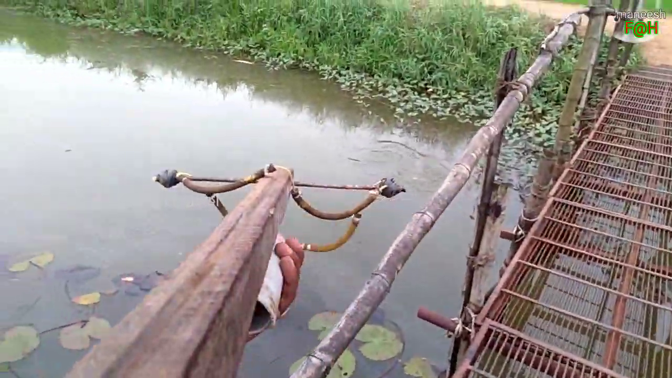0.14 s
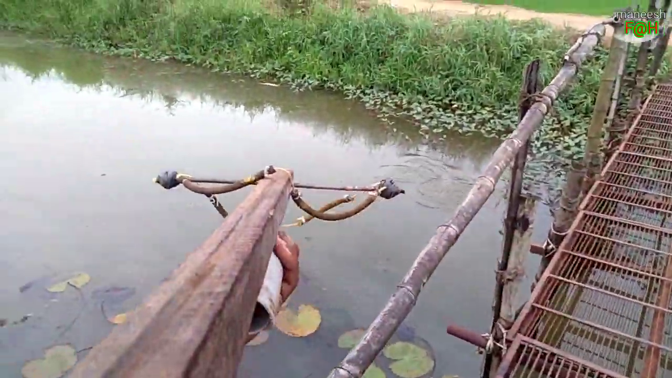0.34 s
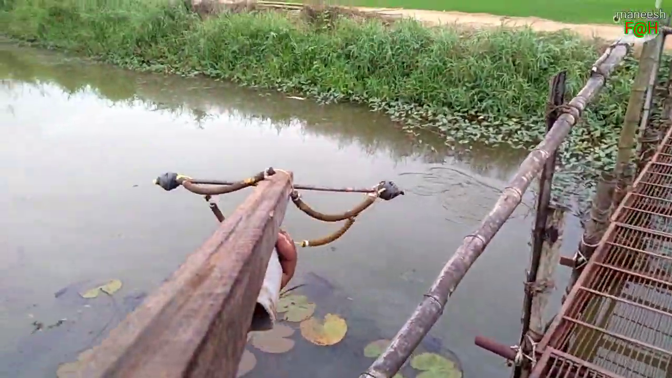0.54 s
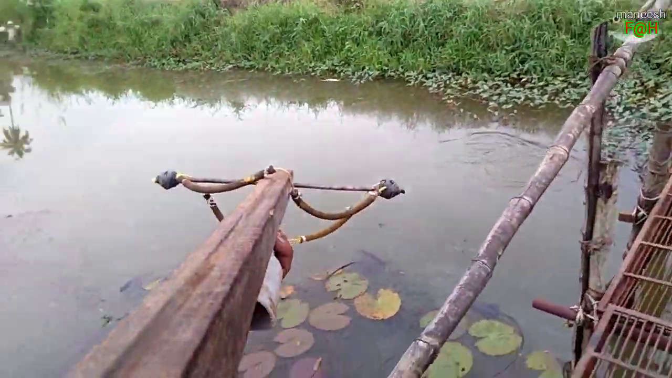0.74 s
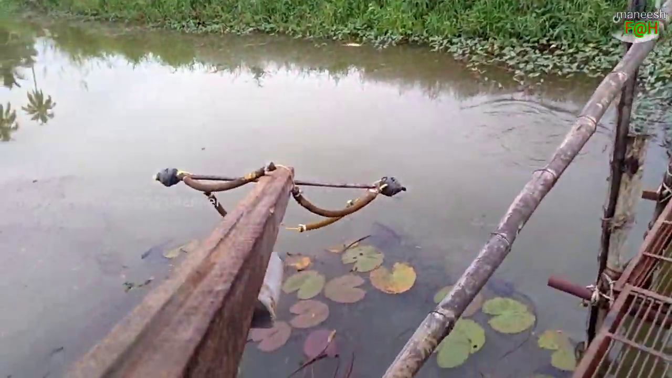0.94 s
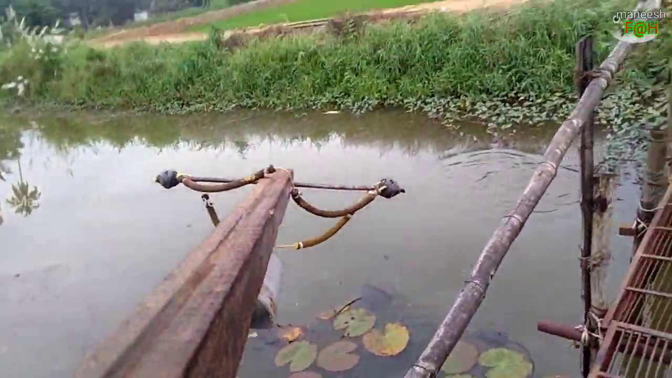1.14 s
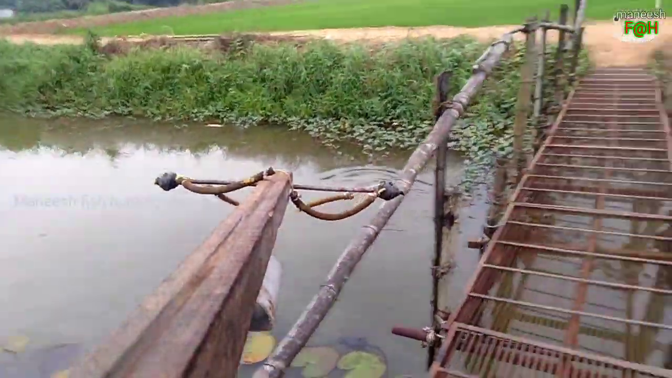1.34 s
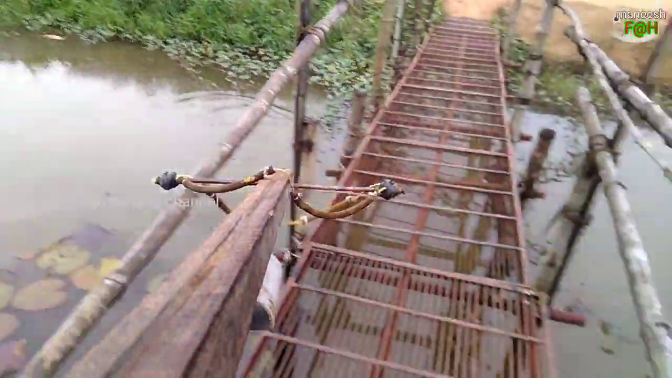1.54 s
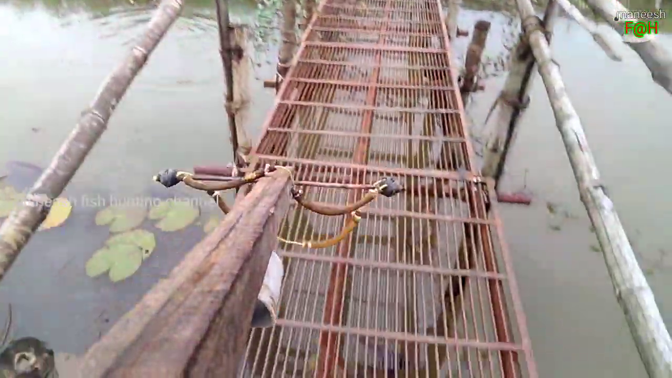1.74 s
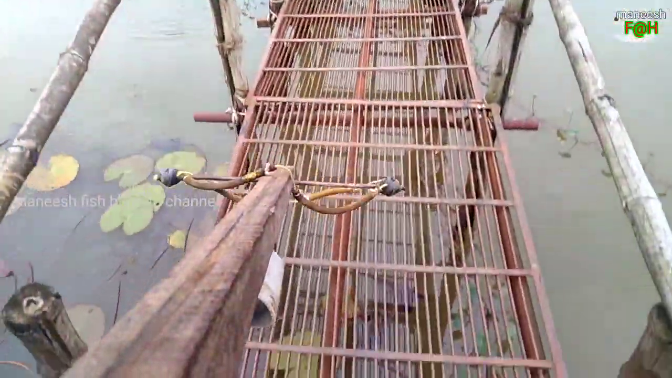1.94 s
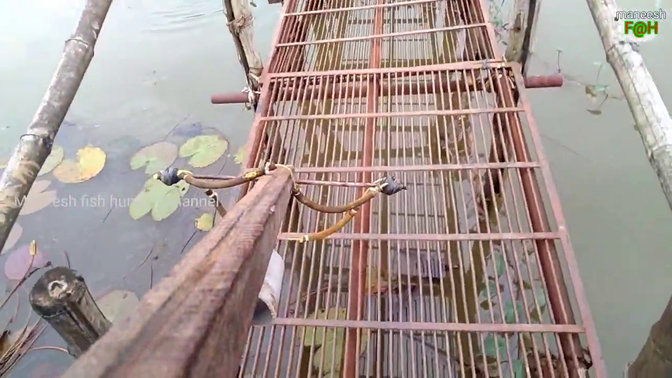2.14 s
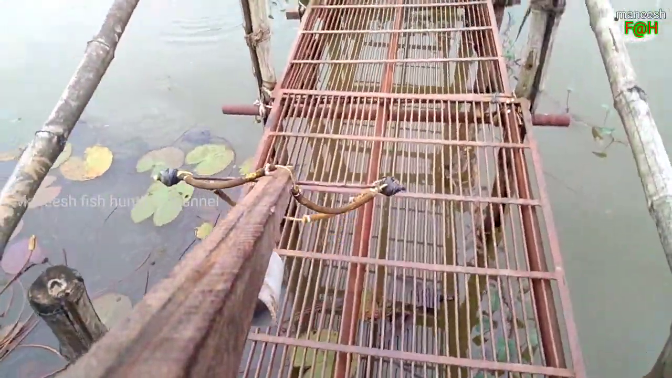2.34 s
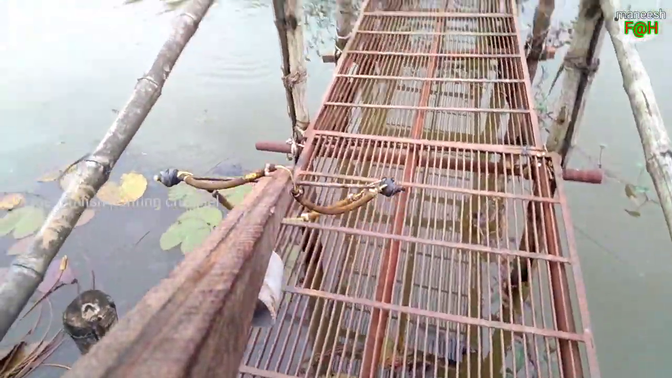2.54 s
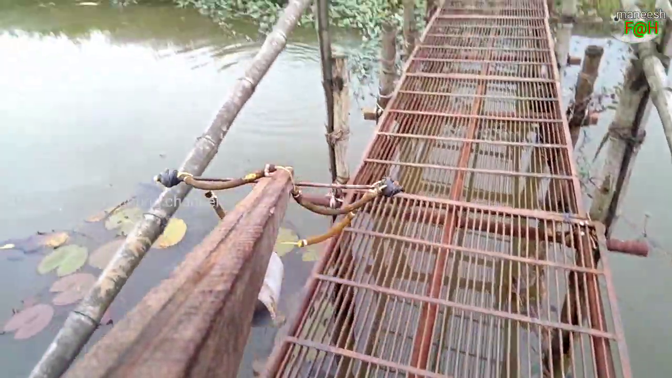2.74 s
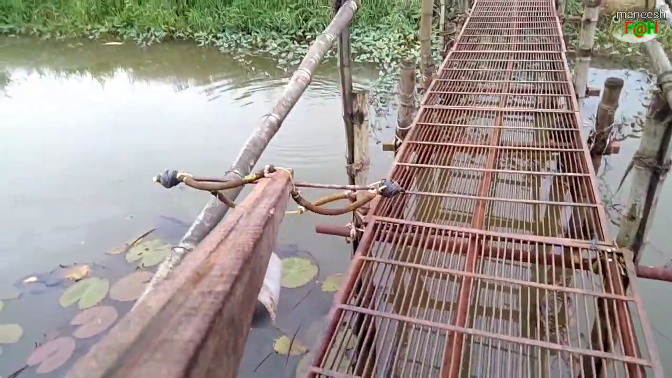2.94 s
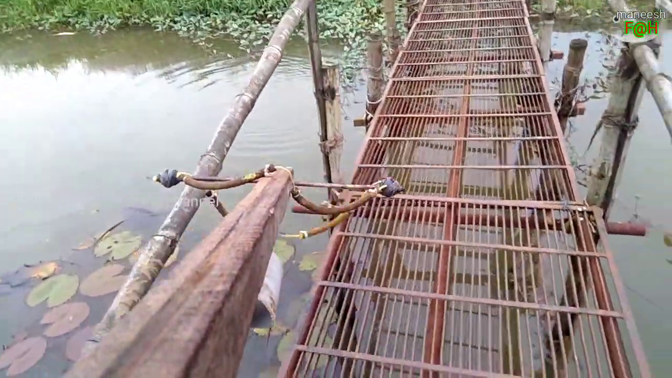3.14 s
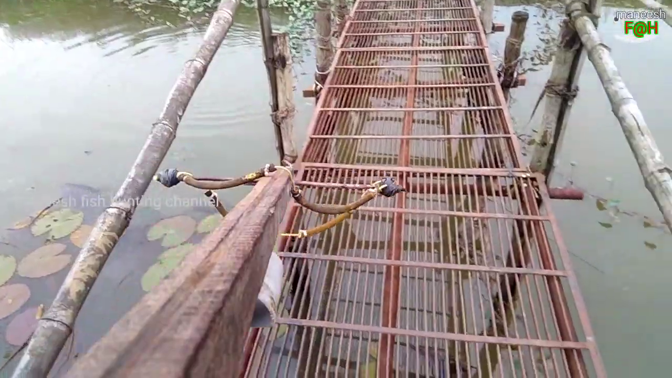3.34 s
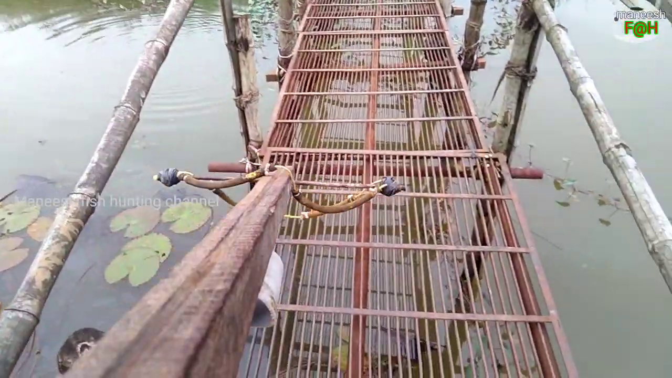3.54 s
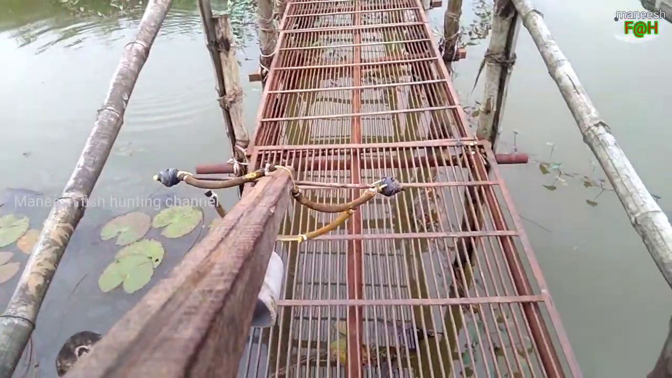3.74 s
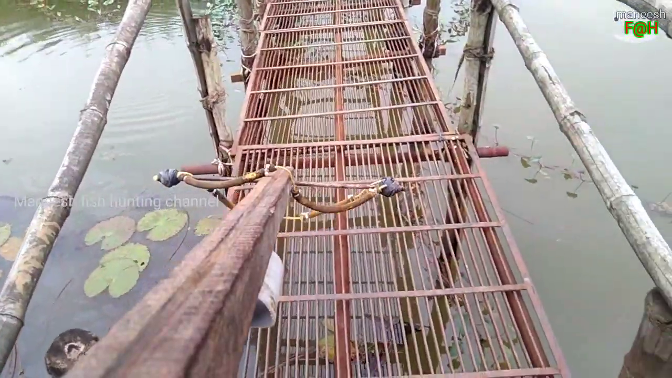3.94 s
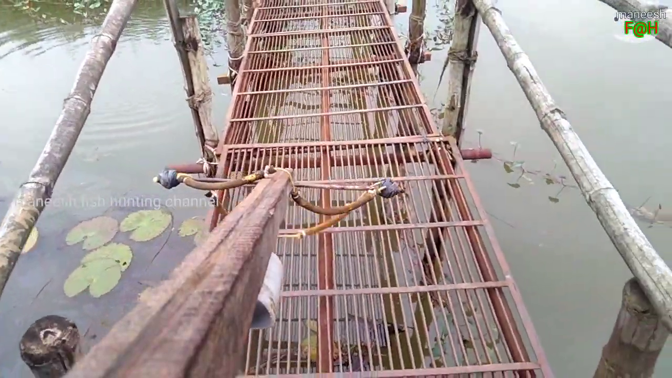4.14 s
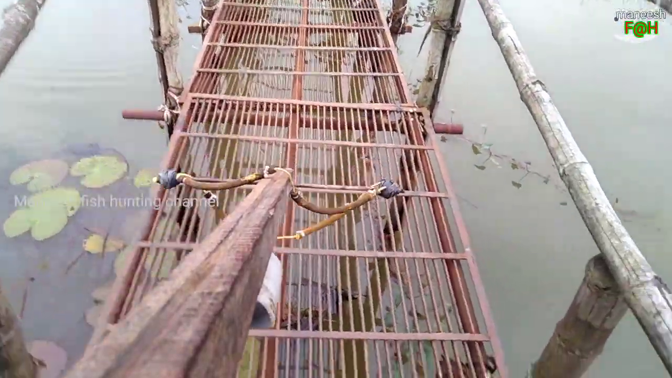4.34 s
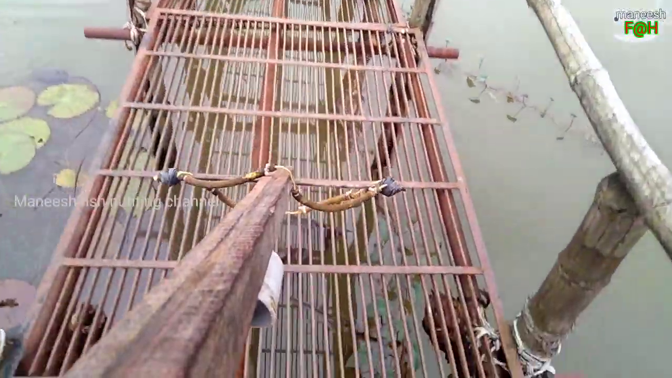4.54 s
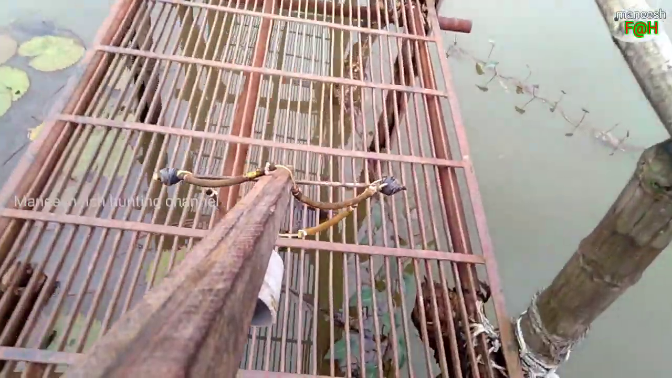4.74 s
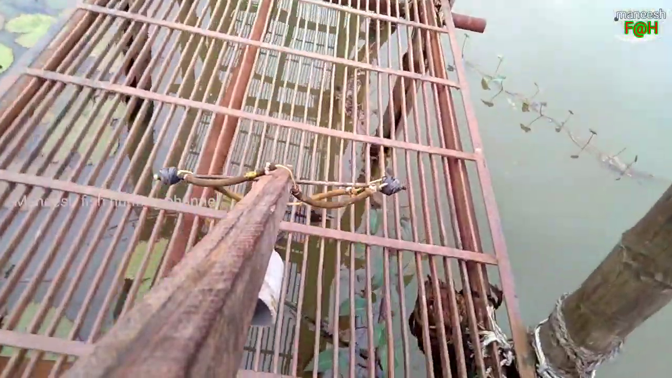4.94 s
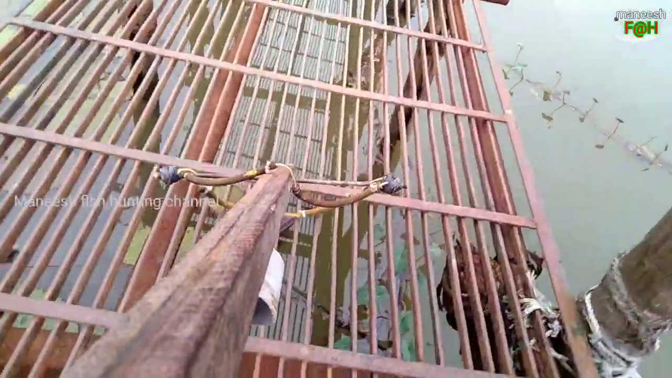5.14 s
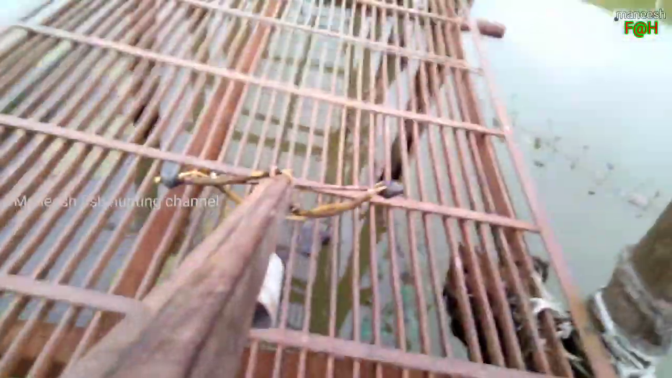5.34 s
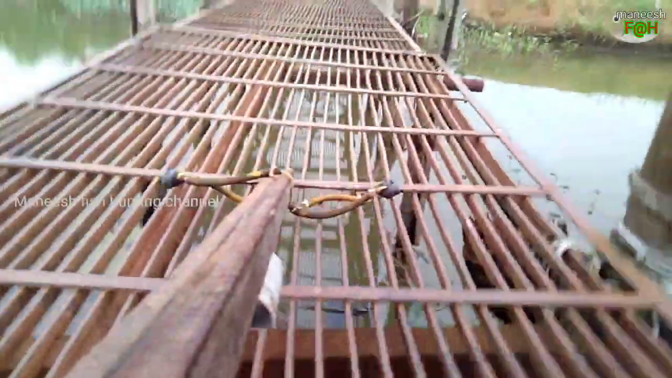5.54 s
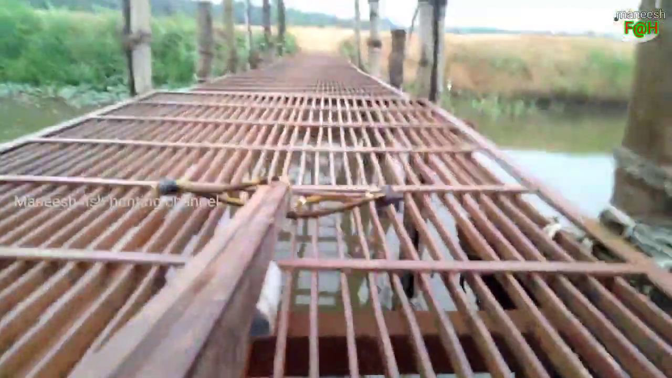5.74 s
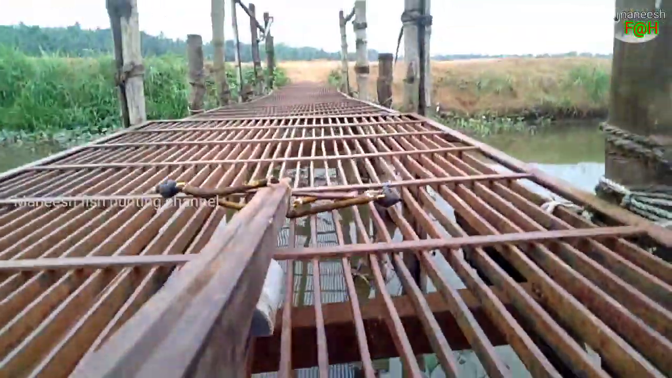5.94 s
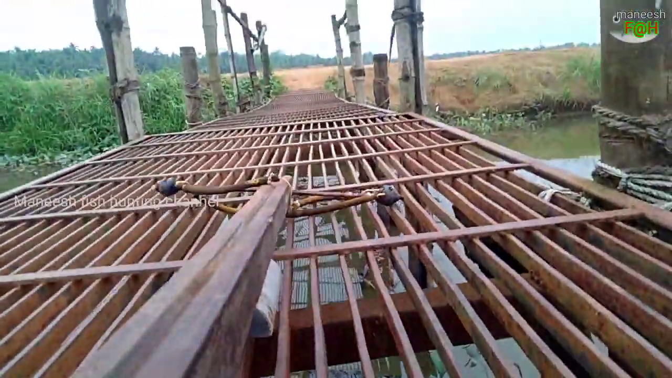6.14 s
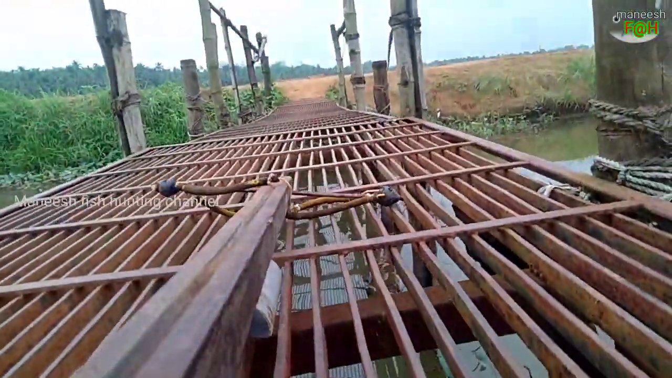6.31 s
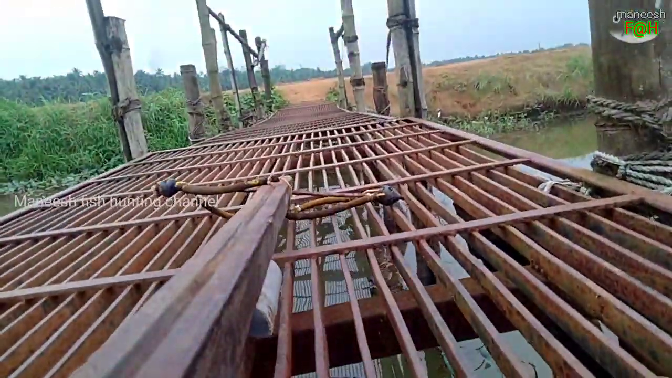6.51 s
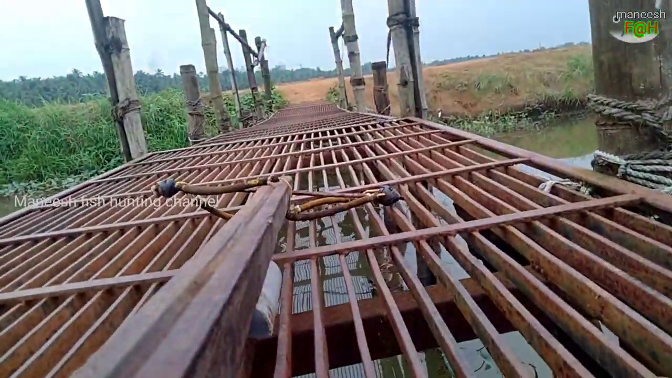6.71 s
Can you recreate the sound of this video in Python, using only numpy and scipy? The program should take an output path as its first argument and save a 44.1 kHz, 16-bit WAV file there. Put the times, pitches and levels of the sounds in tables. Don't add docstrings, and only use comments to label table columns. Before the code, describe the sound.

Close handling of a wooden crossbow clicks and rustles over steady insects and far birds, then the stock thuds twice onto a ringing steel grate.

```python
import sys
import numpy as np
from scipy import signal
from scipy.fft import rfft, irfft
from scipy.io import wavfile
from scipy.ndimage import uniform_filter1d

SR = 44100
rng = np.random.default_rng(int(sys.argv[2]) if len(sys.argv) > 2 else 0)


def output_pcm(signal):
    pcm = np.clip(np.atleast_2d(signal).T, -1, 1) * 32767
    wavfile.write(sys.argv[1], SR, np.round(pcm).astype(np.int16))


def nominal_scale(level):
    x = np.asarray(level, float) / 20
    return 10 ** x


N = 302965
TIME = np.arange(N) / SR
LAID_DOWN_S = 5.7
METAL_HZ, WOOD_HZ = 5600, 4570

# frequency in Hz, level in dB, 60 dB decay in s.
BOARD_MODES = [(263, -4.5, 0.028), (367, -1.5, 0.024), (385, -3.5, 0.05), (555, -6.5, 0.046),
               (754, -2.5, 0.031), (944, -4, 0.029), (1370, -14, 0.052), (1870, -9.5, 0.015),
               (2447, -6, 0.033)]
# frequency in Hz, level in dB, 60 dB decay in s.
BAR_MODES = [(319, -22.5, 1.47), (357.4, -20.5, 1.54), (446, -16, 0.7), (702, -23, 0.94), (614, -24, 0.7),
             (657, -8, 0.37), (752, -24, 1.09), (962, -24, 0.8), (1012.4, -22.5, 1.5), (1110, -27.5, 0.6),
             (1052, -29.5, 1.2), (1475, -21, 0.087), (2050, -11.5, 0.13), (2790, -9.5, 0.374)]


def level(x, db):
    return x * nominal_scale(db) / np.sqrt(np.mean(x ** 2))


def curve(table):
    s, *columns = np.transpose(table)
    return [np.interp(TIME, s, c, left=-140, right=-140) for c in columns]


def band(x, lo_hz, hi_hz, order=2):
    sos = signal.butter(order, [lo_hz, min(hi_hz, .45 * SR)], "band", fs=SR, output="sos")
    return signal.sosfilt(sos, x)


def band_sum(x, bands, order=2):
    return sum(nominal_scale(db) * level(band(x, hz - width / 2, hz + width / 2, order), 0)
               for hz, width, db in bands)


def coloured(table):
    hz, db = np.transpose(table)
    f = np.arange(N // 2 + 1) * SR / N + 1
    shape_db = np.interp(np.log(f), np.log(hz), db, left=-99, right=-99)
    return level(irfft(rfft(rng.standard_normal(N)) * nominal_scale(shape_db), N), 0)


def ring(x, hz, t60):
    pole = np.exp(2j * np.pi * hz / SR - np.log(1000) / (t60 * SR))
    return signal.lfilter([0, pole.imag], [1, -2 * pole.real, abs(pole) ** 2], x)


def walk(rate):
    k = int(SR / rate)
    steps = np.repeat(rng.standard_normal(N // k + 1), k)
    return 1.97 * uniform_filter1d(uniform_filter1d(steps, k), k)[:N]


def grains(spread_db):
    size = np.repeat(rng.exponential(size=N // 16 + 1), 16)[:N]
    return rng.standard_normal(N) * nominal_scale(spread_db * size)


def thuds():
    # start in seconds, stock level in dB, stock pitch in Hz, grate level in dB.
    knocks = [(0.49, -54, 354, -82), (0.56, -47, 306, -86), (0.58, -46.5, 330, -77), (0.56, -59, 910, -78),
              (.945, -47, 770, -80), (.9595, -40.5, 2050, -80), (.9585, -39.5, 2960, -80),
              (4.89, -67, 1500, -88), (5.3, -66, 1000, -87), (0.66, -45, 154, -73), (.721, -53, 500, -62),
              (0.916, -43, 314, -83), (0.962, -34, 330, -66), (0.95, -37.5, 178, -52),
              (5.369, -40, 346, -57), (5.443, -43, 320, -62), (5.587, -56, 1470, -74),
              (5.651, -42, 280, -64), (5.829, -49, 655, -63), (5.371, -34.5, 161, -54.5),
              (5.409, -46, 290, -60.5), (5.5, -39.5, 340, -68), (5.584, -54.5, 2100, -58),
              (5.7096, -32.5, 1990, -58), (5.711, -28, 1545, -68), (5.7108, -40, 4800, -75),
              (5.7105, -25.5, 931, -59), (5.7135, -20.5, 157.5, -35), (5.713, -33, 260, -71),
              (5.716, -32, 540, -70), (5.729, -32.5, 345, -67), (5.748, -28.5, 134, -62),
              (2.598, -70, 3900, -95), (2.618, -67, 3340, -95), (6.325, -65, 1520, -90),
              (6.784, -57, 1330, -80), (6.788, -60, 800, -78), (6.7935, -56, 1130, -80),
              (6.804, -57, 900, -82), (6.799, -50, 705, -79.5), (5.7293, -39.5, 2260, -56),
              (5.7295, -44, 2750, -70), (5.728, -33, 149, -44.5), (6.782, -71, 200, -57.5),
              (6.801, -73, 250, -58.5)]
    # start in seconds, stock dB, stock Hz, grate dB.
    landing = [
        (5.2458, -16.5, 158, -39.5),
        (5.2447, -27.5, 1356, -66),
        (5.2455, -31.5, 926, -67),
        (5.2455, -33, 1130, -70),
        (5.247, -33, 538, -64),
        (5.246, -26.5, 368, -64),
        (5.246, -31, 720, -64),
        (5.248, -33, 620, -64),
        (5.28, -34, 139, -63),
        (5.2462, -35, 3100, -70),
    ]
    # start in seconds, level in dB, pitch in Hz, decay in s.
    bumps = [(3.94, -30.5, 58, 0.061), (4.455, -33.5, 9.9, 0.49), (4.499, -42, 51, 0.14),
             (4.577, -33.5, 82, 0.071), (5.54, -14.5, 64, 0.053), (5.596, -22, 72, 0.073),
             (5.652, -12, 77, 0.015), (5.701, -11, 59, 0.031), (6.032, -30, 73, 0.044),
             (6.074, -30, 57, 0.064), (6.179, -33.5, 97, 0.047)]
    knock_decay_s, knock_at_hz = 0.11, 148
    neighbour_db, bump_grate_db, graze_db = -8.5, -41.5, -6

    twins = [(hz * (1 + 0.0121 * rng.uniform(-1.01, 1)), db + neighbour_db, t60)
             for hz, db, t60 in BAR_MODES]
    modes = list(BOARD_MODES) + list(BAR_MODES) + twins
    first_bar = len(BOARD_MODES)
    rows = [(s, db, hz, knock_decay_s * np.sqrt(knock_at_hz / hz), grate_db)
            for s, db, hz, grate_db in list(knocks) + list(landing)]
    rows += [(s, db, hz, t60, db + bump_grate_db) for s, db, hz, t60 in bumps]

    out, t = np.zeros(N), np.arange(SR // 4) / SR
    blows = np.zeros((len(modes), N))
    spot = rng.standard_normal((len(rows), len(modes)))
    for (s, db, hz, t60, grate_db), share in zip(rows, np.tanh(4 * spot)):
        at = int(s * SR)
        boom = -nominal_scale(db - 60 * t / t60) * np.minimum(t * hz * 0.83, 1) * np.sin(2 * np.pi * hz * t)
        out[at:at + len(t)] += boom[:N - at]
        share[first_bar:] = np.abs(share[first_bar:]) * nominal_scale(graze_db * (s < LAID_DOWN_S))
        blows[:, at:at + 64] += nominal_scale(grate_db) * np.outer(share, np.hanning(64) ** 4) / 9

    buzz = [nominal_scale(1.3 * walk(35)) for _ in range(5)]
    for k, (hz, db, t60) in enumerate(modes):
        tone = nominal_scale(db) * ring(blows[k], hz, t60)
        out += tone * buzz[k % 5] if k >= first_bar else tone
    return out


def bridge():
    # start in seconds, level in dB, 60 dB decay in s, thin rods in dB relative.
    shivers = [
        (.47, -69, 0.9, -15),
        (.56, -69, 0.6, -22),
        (.89, -62.5, 0.46, -20),
        (5.248, -49.5, 1.18, -21),
        (5.715, -47, 0.66, -14.5),
        (5.8, -61, 1.17, -17.5),
    ]
    # centre in Hz, width in Hz, level in dB.
    loaded_span = [(313, 73, 3), (440, 62, 0), (530, 60, -6), (630, 130, -2), (774, 66, -7.5),
                   (1006, 72, -4), (1100, 135, -8.5)]
    # centre in Hz, width in Hz, level in dB.
    grazed_span = [(330.6, 32, 2), (429, 30, 2), (519, 32, -1), (640, 36, -4), (809, 40, -2.5),
                   (900, 40, -8.5), (1012, 30, -6.5), (1085, 33, -6), (1200, 60, -9.5)]

    shake = grains(1.0)
    lumps = [nominal_scale(1.5 * walk(25)) for _ in range(4)]

    def shiver(span):
        return level(sum(lumps[k % 4] * band_sum(shake, [row]) for k, row in enumerate(span)), 0)

    grazed, loaded = shiver(grazed_span), shiver(loaded_span)
    rods = level(band(shake, 1320, 3280, order=4) + 0.8 * band(shake, 2750, 3030), 0)
    out = np.zeros(N)
    for s, db, t60, rods_db in shivers:
        fade = nominal_scale(db - 60 * np.abs(TIME - s) / t60) * np.clip((TIME - s) / 0.011, 0, 1)
        out += fade * ((grazed if s < LAID_DOWN_S else loaded) + nominal_scale(rods_db) * rods)
    return out


def ticks():
    # start in seconds, energy in dB, dull part in dB relative.
    clicks = [(.343, -31.5, -12), (0.5895, -17, -9), (0.68, -24, -9), (.7615, -22, -7.5),
              (0.8283, -28.5, -3.5), (1.3487, -24, -6.5), (1.609, -38, -5), (1.7977, -47, -8),
              (2.577, -38, -9), (2.762, -36, -14), (3.4683, -47, -3), (4.312, -41.5, -12),
              (4.489, -33, -15), (4.6528, -38, -11), (5.1868, -45, -9), (5.2556, -22, -16),
              (5.299, -22.5, -6), (5.5438, -30, -6), (5.5685, -41, 1), (5.5887, -44, -2), (5.707, -22, -28),
              (5.7667, -23.5, -23), (6.0351, -22.5, -20), (.585, -32, -20), (5.2497, -33, 6),
              (5.9045, -39, -10), (0.7622, -29, -14)]
    # start in seconds, energy in dB, dull part in dB relative, decay in ms.
    cracks = [(.4564, -34, -10, 12), (0.9592, -13.5, -12, 12), (6.033, -26.5, -14, 2.9),
              (6.2853, -39, -14, 9), (5.2445, -12.5, -1.5, 9), (5.2462, -5, -6, 4.8),
              (5.2516, -16.5, -19, 1.3), (5.2931, -31, -7, 5), (5.6544, -7.5, -15, 3.5),
              (5.656, -22, -8, 15), (5.658, -23, -8, 8), (5.6755, -12, -10.5, 4.2), (5.677, -29, -10, 14),
              (5.7112, -0.5, -6.5, 7.2), (5.7161, -14.5, -19, 5.2), (5.7218, -16, -14, 2.7),
              (5.7258, -23, -21, 2.5), (5.732, -38, -8, 7.4), (5.748, -18, -15, 4.2),
              (5.8958, -35.5, -1.5, 14), (5.925, -40, -5, 20), (6.281, -33, -10.5, 11),
              (6.4059, -30.5, -10, 21), (6.5811, -37, -9.5, 2.9)]
    # start in seconds, energy in dB.
    taps = [
        (0.7232, -40.5),
        (4.677, -52),
        (4.8, -49),
        (4.915, -39.5),
        (5.7602, -29),
        (6.7885, -50.5),
        (6.804, -46),
    ]
    # start in seconds, energy in dB.
    flicks = [
        (.0333, -29),
        (.2003, -39),
        (0.3186, -42),
        (1.0107, -40),
        (1.091, -53),
        (1.191, -40),
        (1.3071, -47),
        (5.0045, -47),
    ]
    click_ms, tap_ms = 2.1, 3.7

    rows = [(s, db + dull_db, db, db - 17, click_ms, METAL_HZ) for s, db, dull_db in clicks]
    rows += [(s, db + dull_db, db, db - 6, ms, WOOD_HZ) for s, db, dull_db, ms in cracks]
    rows += [(s, db, db - 14, db - 21, tap_ms, WOOD_HZ) for s, db in taps]
    rows += [(s, db - 16, db - 2.5, db, click_ms, METAL_HZ) for s, db in flicks]

    out, t = np.zeros(N), np.arange(512) / SR
    for s, *parts_db, decay_ms, dull_top_hz in rows:
        burst = rng.standard_normal(512) * np.minimum(t / 0.00041, 1)
        burst *= nominal_scale(-60e3 * t / max(decay_ms, 1))
        burst[6] += 40 / max(decay_ms, 2) ** 2.2
        dull = band(burst, 1190, dull_top_hz, order=3)
        middle = -band(burst, 6060, 11700, order=3) - 2.8 * band(burst, 8400, 9560, order=1)
        bright = band(burst, 10200, 25000)
        at = int(s * SR)
        for part, db in zip((dull, middle, bright), parts_db):
            out[at:at + 512] += nominal_scale(db) * part / np.sqrt(np.sum(part ** 2))
    return out


def handling():
    slips, scrape, chatter = grains(1.8), grains(1.6), grains(1.8)
    fine = level(band(slips, 8460, 14400) + 2.2 * band(slips, 9050, 10300), 0.75)
    coarse = level(band(scrape, 1600, 7600) + 0.53 * band(scrape, 1800, 2600), 0.15)
    modes = list(BOARD_MODES) + list(BAR_MODES)
    shaken = level(sum(nominal_scale(db) * ring(chatter, hz, min(t60, .045)) for hz, db, t60 in modes), -3)
    shaken += level(band(grains(1.8), 300, 1250), -2)
    return sum(part * gain for part, gain in zip((fine, coarse, shaken), effort()))


def effort():
    # start and end in seconds, final level in dB, scrape and wood in dB relative.
    rubs = [
        (.1, 0.424, -74, -6, -2.5),
        (0.418, 0.663, -62, -3, -5.5),
        (0.435, 0.68, -56, -10, -16),
        (0.65, 0.862, -72.5, -6.5, -2.5),
        (0.866, 0.959, -48.5, -9.5, -14),
        (4.5, 4.858, -90.5, 14, 11),
        (5.51, 5.606, -67.5, -6, 4),
        (5.622, 5.698, -68.5, -2, 5),
        (5.877, 6.72, -84, -1.5, 5.5),
    ]
    # start in seconds, level in dB, wood in dB relative, 60 dB decay in s.
    jolts = [(0, -61.5, -9, 0.7), (0.963, -69, 16, 0.19), (1.0, -72, -6, 1.8), (2.595, -68, -6, 0.22),
             (2.768, -64.5, -17, .15), (4.78, -79, 1, 2.6), (5.247, -38, 11.5, 0.027),
             (5.26, -63.5, 4.5, 1.3), (5.37, -83, 2, 0.45), (5.716, -47, 11.5, 0.13), (5.73, -59, 21, 0.12),
             (5.76, -69, 11, 1.17)]
    growth_db, uneven_db, attack_s, release_s = 4, 1.6, .045, .05
    jolt_coarse_db = -9.5

    power = np.zeros((3, N))
    for start, end, db, scrape_db, wood_db in rubs:
        press_db = db - growth_db * np.clip((end - TIME) / (end - start), 0, 1)
        press_db -= 60 * np.maximum(TIME - end, 0) / release_s
        gain = nominal_scale(press_db + uneven_db * walk(30)) * np.clip((TIME - start) / attack_s, 0, 1)
        power += np.outer(nominal_scale([0, scrape_db, wood_db]), gain) ** 2
    for s, db, wood_db, t60 in jolts:
        gain = nominal_scale(db - 60 * np.abs(TIME - s) / t60) * (TIME >= s)
        power += np.outer(nominal_scale([0, jolt_coarse_db, wood_db]), gain) ** 2
    return np.sqrt(power)


def singing_stock_and_scuff():
    start, end, sing_db = .915, .964, -59.5
    # centre in Hz, width in Hz, level in dB.
    stock_body = [(800, 70, 1), (1730, 50, -4), (2020, 110, 3), (2190, 50, -4), (2880, 130, -2),
                  (3760, 80, -10)]
    # time in seconds, scuff level in dB.
    scuff = [
        (6.778, -100.5),
        (6.786, -65.5),
        (6.808, -62.5),
        (6.818, -58.5),
        (6.87, -59.5),
    ]
    # centre in Hz, width in Hz, level in dB.
    scuff_body = [(650, 520, -4), (1480, 560, -1), (2680, 390, 4.5), (3370, 700, 2), (4700, 470, -16),
                  (5640, 670, -11), (7000, 700, -12), (9050, 650, 2.5)]

    rub = grains(.9)
    song = level(band_sum(rub, stock_body, order=1), sing_db)
    song *= np.clip((TIME - start) / (end - start), 0, 1) * nominal_scale(-60 * np.maximum(TIME - end, 0) / 0.12)
    hollow = level(band_sum(rub, scuff_body), 0)
    hollow += nominal_scale(-8.0) * level(band(rub, 1300, 8000, order=1), 0)
    hollow += 0.34 * level(band(rub, 5300, 18700, order=1), 0)
    return song + hollow * nominal_scale(curve(scuff)[0])


def gliding_notes(notes):
    out, waver_hz = np.zeros(N), 3000 * 0.007 * walk(120)
    for s, length, start_hz, end_hz, db in notes:
        n, at = int(length * SR), int(s * SR)
        hz = np.linspace(start_hz, end_hz, n) + waver_hz[at:at + n]
        out[at:at + n] += nominal_scale(db) * np.hanning(n) ** 0.25 * np.sin(2 * np.pi * np.cumsum(hz) / SR)
    out *= 1.1 * nominal_scale(1.4 * walk(90))
    return out + .4 * np.roll(out, 310) + .15 * np.roll(out, 900)


def rubber_squeaks():
    # start in seconds, pitch in Hz, level in dB.
    squeaks = [
        (4.645, 9500, -77),
        (4.95, 9550, -71),
        (5.04, 9450, -77),
        (5.33, 8800, -69),
        (5.37, 9700, -74),
        (5.37, 9300, -78),
        (5.79, 9700, -65),
        (5.79, 9300, -64),
        (6.09, 8400, -79),
    ]
    return gliding_notes([(s, .04, hz, hz, db) for s, hz, db in squeaks])


def wind():
    # peak in seconds, rise in s, fall in s, buffet level in dB, flutter level in dB.
    gusts = [(.05, 0.61, 0.82, -55.5, -68.5), (.65, 0.33, 0.3, -82.5, -55), (.86, 0.091, .08, -54.5, -74),
             (0.962, 0.091, 0.25, -56, -57), (3.43, 0.055, 0.25, -55.5, -86), (4.5, 0.077, 1, -55.5, -65),
             (5.3, 0.052, 0.31, -44.5, -48.5), (5.642, 0.13, 0.24, -38, -52.5),
             (5.798, 0.19, 0.18, -53, -54), (6.048, 0.083, 0.08, -46.5, -58),
             (6.162, 0.089, 0.12, -65, -60), (6.398, 0.34, 0.4, -60, -61), (6.87, 0.31, .2, -60, -60)]
    buffet_power, flutter_power = nominal_scale(-62.5) ** 2, nominal_scale(-69) ** 2
    for s, rise, fall, buffet_db, flutter_db in gusts:
        swell = nominal_scale(-15 * np.maximum((s - TIME) / rise, (TIME - s) / fall))
        buffet_power = buffet_power + (nominal_scale(buffet_db) * swell) ** 2
        flutter_power = flutter_power + (nominal_scale(flutter_db) * swell) ** 2
    buffet = level(band(rng.standard_normal(N), 10.7, 83.6), 0) * np.sqrt(buffet_power)
    flutter = level(band(grains(1.0), 86, 187.7), 0) * np.sqrt(flutter_power)
    return buffet + flutter * nominal_scale(1.0 * walk(25))


def cricket(cricket_db):
    cricket_hz, strokes_per_s = 6590, 100
    chirp_s, first_gap_s = .1326, .121
    in_chirp = ((TIME - first_gap_s) / chirp_s + 0.043 * walk(2.9)) % 1
    chirp = np.clip(np.minimum(in_chirp - .02, .98 - in_chirp) * 8, .5, 1)
    stroke = np.clip(np.sin(np.pi * TIME * strokes_per_s) ** 2 + 0.14, 0, 1)
    wing = np.sin(2 * np.pi * cricket_hz * TIME + 1.1 * walk(60))
    wing += .7 * level(band(rng.standard_normal(N), 6330, 6720), 0)
    return level(wing * stroke * chirp * nominal_scale(1.35 * walk(30)), 0.83) * nominal_scale(cricket_db + 1.0)


def cicadas(choirs_db):
    # centre in Hz, width in Hz.
    choirs = [(7796, 670), (9500, 1360), (9270, 560)]
    out = np.zeros(N)
    for (hz, width), db in zip(choirs, choirs_db):
        choir = level(band(grains(0.99), hz - width / 2, hz + width / 2, order=3), 0.39)
        out += choir * nominal_scale(db + 0.91 * walk(12))
    return out


def katydid():
    # centre in Hz, width in Hz, level in dB.
    wing_bands = [(12600, 500, -2), (13650, 350, 0), (14500, 500, -1), (15300, 400, 0)]
    # start and end in seconds, level in dB.
    songs = [
        (1.85, 2.5, -80.5),
        (6.1, 6.74, -77.5),
    ]
    stutter_start, stutter_end, stutter_per_s, stutter_db = 6.05, 6.25, 62, -77
    rasp = grains(1.5)
    voice = level(sum(nominal_scale(1.4 * walk(7.1)) * band_sum(rasp, [row], order=1) for row in wing_bands), 0)
    out = np.zeros(N)
    for start, end, db in songs:
        out += voice * nominal_scale(db) * np.clip(np.minimum(TIME - start, 5 * (end - TIME)) / 0.18, 0, 1)
    stutter = np.maximum(np.sin(2 * np.pi * stutter_per_s * TIME), 0) ** 3
    stutter *= (TIME > stutter_start) * (TIME < stutter_end)
    return out + stutter * level(band(rasp, 14000, 15400), stutter_db)


def wing_buzz():
    start, decay_s = 2.762, 0.2
    fade = nominal_scale(-60 * np.abs(TIME - start) / decay_s) * (TIME > start)
    return level(band(grains(1.5), 4700, 5500), -75.5) * fade


def birds():
    # start in seconds, length in s, start pitch in Hz, end pitch in Hz, level in dB.
    whistles = [
        (1.13, .08, 2900, 4500, -87),
        (1.61, .09, 3000, 4800, -84),
        (2.425, .08, 1960, 2000, -80),
        (2.57, .1, 2400, 3160, -89),
        (3.165, .072, 3060, 4450, -83),
        (4.455, .075, 2900, 4200, -78.5),
        (4.905, .08, 3000, 4550, -83),
        (4.085, .012, 4000, 3700, -84),
        (6.33, .015, 3010, 3040, -72),
        (6.63, .063, 3400, 3600, -83),
    ]
    # start in seconds, level in dB.
    trills = [
        (1.665, -83),
        (2.32, -84),
        (3.31, -83),
        (4.24, -82),
    ]
    # start in seconds, level in dB.
    warbles = [(2.41, -83.5), (2.59, -85), (2.82, -85), (3.02, -86), (3.24, -87), (3.452, -84), (3.7, -85),
               (3.915, -84), (4.18, -84), (4.72, -88), (4.99, -88)]
    notes = list(whistles)
    for s, db in trills:
        notes += [(s + .005 + 0.033 * k, .012, 6000, 5350, db - 2.5) for k in range(3)]
    for s, db in warbles:
        notes += [(s + 0.048 * k, .018, 2850, 3200, db - .8) for k in range(2)]
        fall_hz = 2800 - 250 * (s > 3)
        notes += [(s + 0.021 + 0.045 * k, .022, 3250, fall_hz, db + .8) for k in range(2)]
    return gliding_notes(notes)


def far_hum_and_air(hum_db, air_db):
    # frequency in Hz, level in dB per Hz.
    hum = [(130, -12), (200, -9.5), (260, 5.5), (330, -28), (420, -14), (560, -5.5), (700, -5.5),
           (1000, -11), (1600, -12), (2500, -17), (4000, -25.5), (5500, -28.5)]
    # frequency in Hz, level in dB per Hz.
    air = [(2000, -12), (3000, 1.5), (4500, -5), (6000, -3), (8000, 9.5), (10500, -0.5), (11500, -2.5),
           (15500, 0), (16000, 9)]
    swell_db = .6 * walk(6)
    return coloured(hum) * nominal_scale(hum_db - 2.0 + swell_db) + coloured(air) * nominal_scale(air_db - 5.5)


def surroundings():
    # time in seconds, shade in dB.
    shade = [(0, 1.5), (.4, -2.5), (1.1, -3), (1.8, -7), (3.2, -7.5), (4.06, -6), (4.7, -8.5),
             (5.28, -15.5), (5.8, -7), (6.37, -19.5), (6.87, -27)]
    # open level in dB, share of shade felt.
    layers = [(-80.5, 1.05), (-72.5, 0.19), (-74.5, 0), (-67.5, 1.02), (-66, 0.99), (-75.5, 0.21)]
    shade_db = curve(shade)[0]
    cricket_db, hum_db, air_db, *choirs_db = (db + share * shade_db for db, share in layers)
    insects = cricket(cricket_db) + cicadas(choirs_db) + katydid() + wing_buzz()
    return insects + far_hum_and_air(hum_db, air_db)


def scene():
    top = signal.ellip(8, .2, 60, 15520, fs=SR, output="sos")
    edges = ticks()
    crossbow = thuds() + bridge() + handling() + singing_stock_and_scuff() + rubber_squeaks()
    mix = crossbow + wind() + birds() + surroundings() + 0.65 * edges
    return (signal.sosfilt(top, mix) + 0.17 * edges)[None]


def roll_off(x):
    return signal.sosfilt(signal.butter(12, 16790, fs=SR, output="sos"), x)


def record(dry):
    limit = signal.ellip(8, .2, 60, 16600, fs=SR, output="sos")
    rounded = .45 * np.tanh(dry / .45)
    return roll_off(signal.sosfilt(limit, rounded))


dry = scene()
out = record(dry)
output_pcm(out)
```